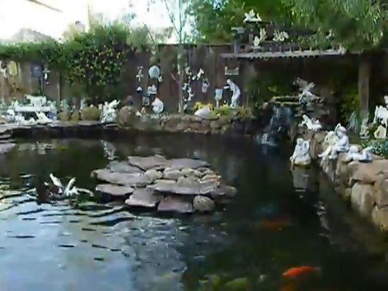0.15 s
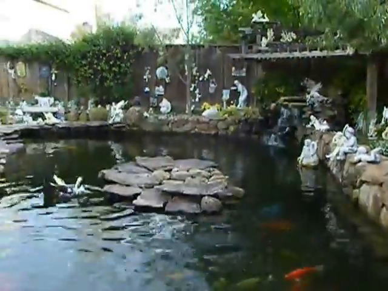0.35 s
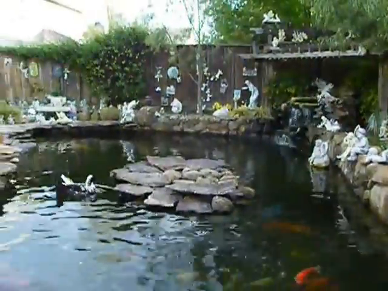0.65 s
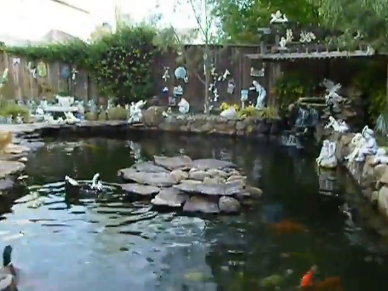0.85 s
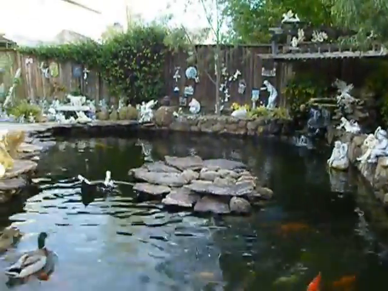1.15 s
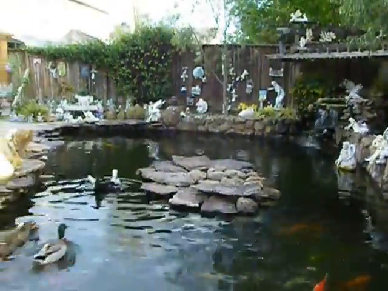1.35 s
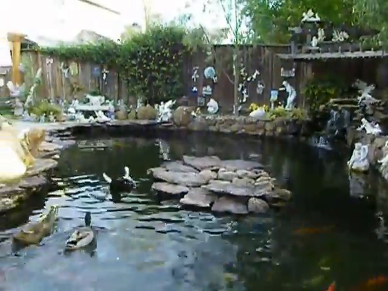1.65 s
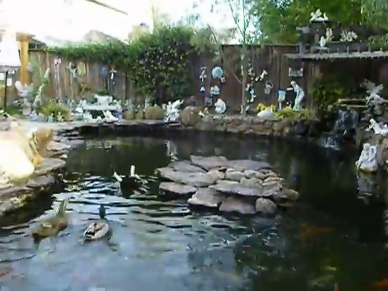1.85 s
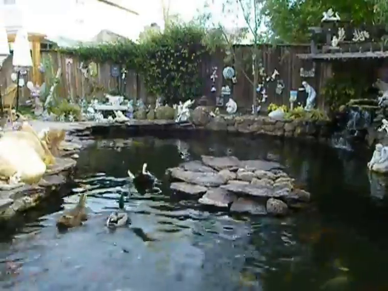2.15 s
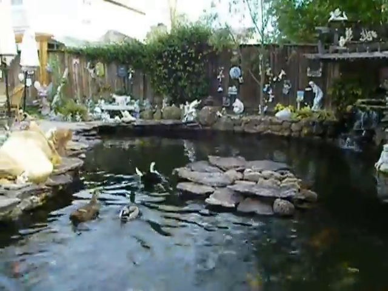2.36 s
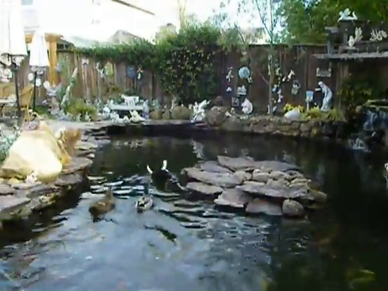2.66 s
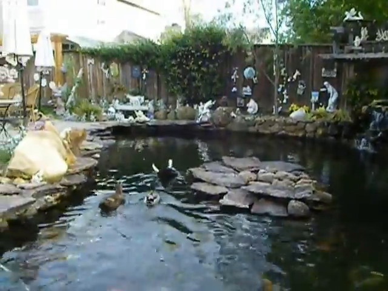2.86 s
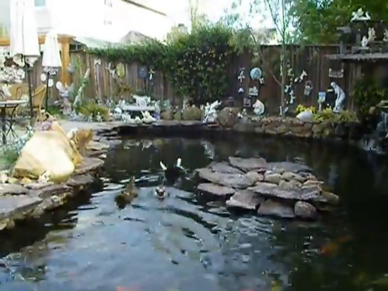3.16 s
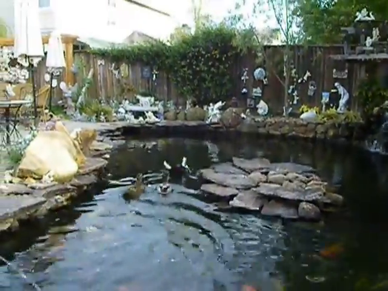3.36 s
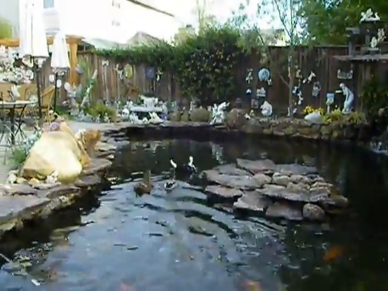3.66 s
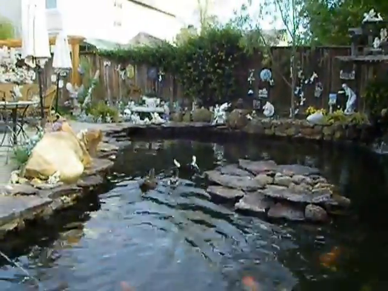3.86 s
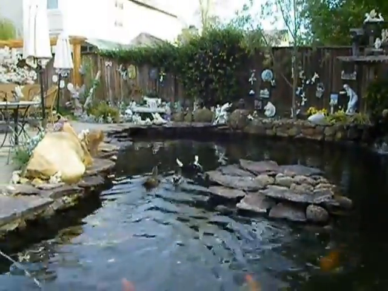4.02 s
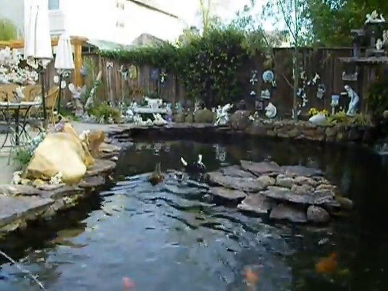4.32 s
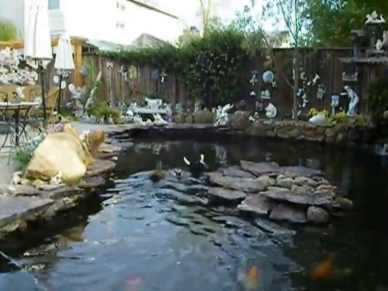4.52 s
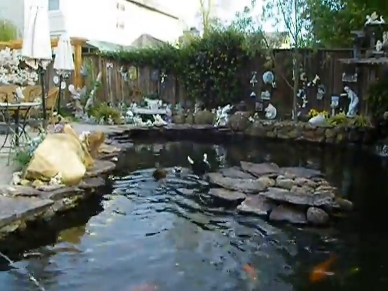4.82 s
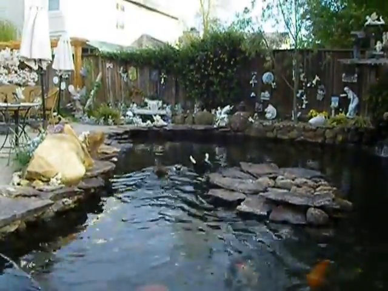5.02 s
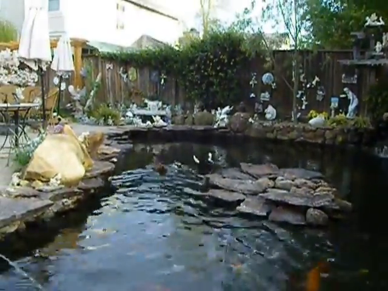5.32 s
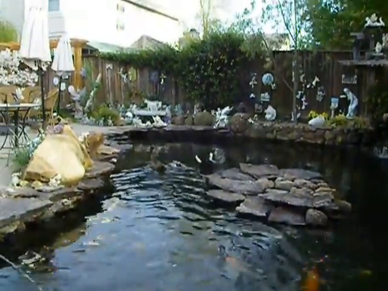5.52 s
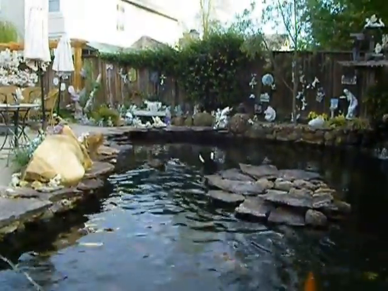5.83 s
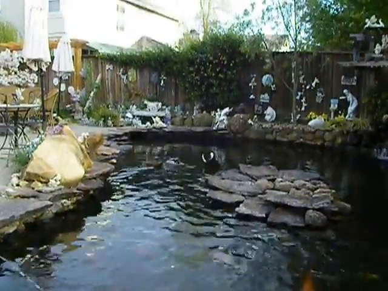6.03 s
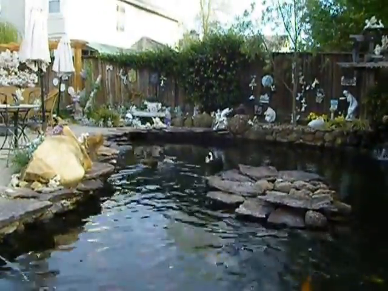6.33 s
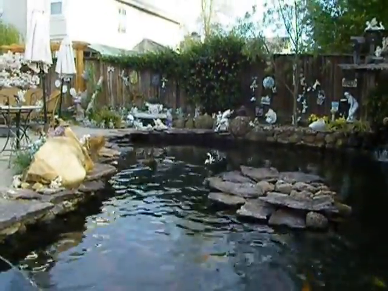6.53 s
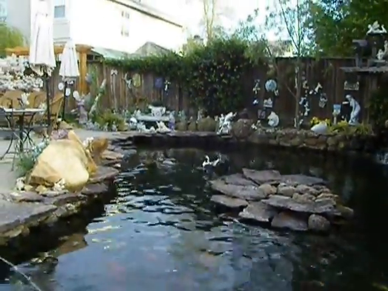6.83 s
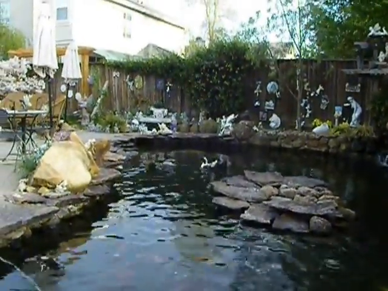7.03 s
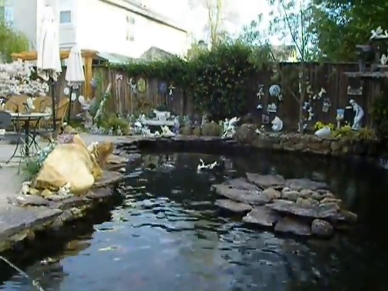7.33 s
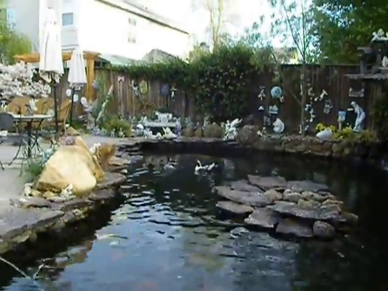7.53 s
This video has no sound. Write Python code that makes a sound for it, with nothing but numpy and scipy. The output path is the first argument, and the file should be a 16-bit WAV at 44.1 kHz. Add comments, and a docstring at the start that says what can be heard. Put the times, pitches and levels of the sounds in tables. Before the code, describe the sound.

A small waterfall splashes steadily into a garden pond, and a duck quacks three times in the second half.

```python
"""Garden waterfall and a duck

A small waterfall splashes into a pond in a fenced yard, heard on one small camera microphone.
Countless drops tick and fizz over a soft wash, bubbles gurgle below it, and a pump hums faintly
over distant rumble. From about five seconds in, a duck quacks three times, pulses of air ringing
its throat and bill; the last quack ends in a creak. The yard returns a short echo."""
import sys
import numpy as np
from scipy import signal
from scipy.fft import rfft, irfft
from scipy.io import wavfile
from scipy.ndimage import uniform_filter1d

SR = 44100
rng = np.random.default_rng(int(sys.argv[2]) if len(sys.argv) > 2 else 0)


def master_out(mix):
    """Clip the mix to full scale and print it as 16-bit PCM to the path in sys.argv[1]."""
    frames = np.transpose(np.atleast_2d(mix))
    ceiling = np.clip(frames, -1, 1)
    pcm = np.round(ceiling * 32767).astype(np.int16)
    wavfile.write(sys.argv[1], SR, pcm)


N = 338688
TIME = np.arange(N) / SR
SURGE_HZ = 22.5  # how fast the stream surges at random
BILL_SHUT_DB = -12  # the duck's shut bill against its throat


def gain_of(db):
    """Decibels to amplitude."""
    return 10 ** (np.asarray(db) / 20)


def unit_rms(x):
    """Scales to an rms of 1."""
    return x / np.sqrt(np.mean(x ** 2) + 1e-20)


def at_hz(points, hz):
    """Reads a curve on a log-frequency axis."""
    freqs, values = np.transpose(points)
    return np.interp(np.log(hz + 1), np.log(freqs + 1), values)


def follow(rows, t):
    """Reads every column of a curve at the times t."""
    times, *columns = np.transpose(rows)
    return [np.interp(t, times, column) for column in columns]


def add(mix, start_s, sound):
    """Adds a sound to the mix at start_s."""
    part = mix[max(round(start_s * SR), 0):][:len(sound)]
    part += sound[:len(part)]


def coloured(x, spectrum):
    """Filters x by a spectrum and scales it to an rms of 1."""
    hz = np.fft.rfftfreq(len(x), 1 / SR)
    return unit_rms(irfft(rfft(x) * gain_of(at_hz(spectrum, hz)), len(x)))


def drift(size, rate_hz):
    """A smooth random wander of rms 1, with little motion above rate_hz."""
    hz = np.fft.rfftfreq(size, 1 / SR)
    return unit_rms(irfft(rfft(rng.standard_normal(size)) * np.exp(-(hz / rate_hz) ** 2), size))


def resonate(x, hz, width_hz):
    """A resonance of gain 1 whose frequency may move."""
    carrier = np.exp(2j * np.pi * np.cumsum(hz * np.ones(len(x))) / SR)
    pole = np.exp(-np.pi * width_hz / SR)
    return 2 * (carrier * signal.lfilter([1 - pole], [1, -pole], x / carrier + 1e-18)).real


def bubble(hz, cycles, rise_cycles, glide, size):
    """A pocket of air rings up and dies away over the given cycles; glide lifts its pitch."""
    turns = hz * np.arange(size) / SR
    bend = 1 + glide * np.minimum(turns / cycles, 2)
    envelope = (1 - np.exp(-turns / rise_cycles)) * np.exp(-turns / cycles)
    wave = envelope * np.sin(2 * np.pi * turns * bend)
    return wave / abs(wave).max()


def shower(pitches, per_s, spread_db, cycles, glide, spray_db, spray_s, size):
    """Drops of all sizes land at random; each throws off a few smaller ones of nearby pitch."""
    count = int(per_s * N / SR)
    when, heft, pitch, polarity, shift = rng.random((count, 5, 5)).transpose(1, 0, 2)
    thrown = np.arange(5) > 0  # the parent drop, then four thrown off
    landing = (when[:, :1] * N - thrown * np.log(1 - when) * spray_s * SR).astype(int) % N
    size_db = spread_db * np.minimum(-np.log(1 - heft[:, :1]), 4.5) + thrown * spray_db
    band = (pitch[:, :1] * len(pitches) + thrown * 6 * (shift - .5)).astype(int)
    height = np.sign(polarity - .5) * gain_of(size_db)
    out = np.zeros(N)
    for k, hz in enumerate(pitches):
        hits = np.bincount(landing[band == k], height[band == k], N)
        ring = bubble(hz, cycles, rise_cycles=0.26, glide=glide, size=size)
        out += signal.oaconvolve(unit_rms(hits), np.sqrt(hz) * ring / np.linalg.norm(ring))[:N]
    return out


def waterfall():
    """Wash, ticking impacts and tiny ringing bubbles, all arriving in uneven gushes."""
    # the fall grows fainter as the microphone turns away from it: time_s, level_db
    flow_curve = [(0, -27), (1.3, -26.5), (3.1, -28.5), (5.0, -29.5), (7.68, -28)]
    # spectrum of the blended wash: frequency_hz, level_db
    wash_spectrum = [(200, -31), (600, -16.5), (1100, -6), (2000, -6), (3200, -5.5), (4200, -3), (5200, 1),
                     (6800, 2.5), (8500, -4.5), (10000, -7.5), (13000, -12), (16000, -17)]
    # spectrum of the separate droplets: frequency_hz, level_db
    spray_spectrum = [(300, -41), (1000, -10.5), (2000, -1), (3200, 0.5), (4200, -1), (5200, 0), (6800, 3),
                      (8500, -3), (10000, -7), (13000, -13.5), (16000, -19)]
    flow = gain_of(follow(flow_curve, TIME)[0] + 0.48 * drift(N, SURGE_HZ))
    gush = drift(N, rate_hz=77)
    wash = gain_of(-4 + 0.64 * gush) * coloured(rng.standard_normal(N), wash_spectrum)
    ticks = shower(np.geomspace(1800, 14000, num=16), per_s=1000, spread_db=4, cycles=1.18,
                   glide=0, spray_db=-8, spray_s=.002, size=256)
    fizz = shower(np.geomspace(1100, 14000, num=36), per_s=1000, spread_db=4.5, cycles=6.8,
                  glide=0.031, spray_db=-11, spray_s=.003, size=1600)
    droplets = gain_of(-4) * coloured(ticks, spray_spectrum)
    droplets += gain_of(-3) * coloured(fizz, spray_spectrum)
    return flow * (wash + gain_of(2.1 * gush) * droplets)


def pool():
    """Larger bubbles gurgle where the stream plunges in; a few gulp loudly."""
    # the churning under the fall: time_s, level_db
    churn_curve = [(0, -40), (3.2, -40.5), (4.9, -41), (7.68, -41)]
    # spectrum of the churning: frequency_hz, level_db
    spectrum = [(100, -39), (200, -20.5), (270, -10.5), (330, -6.5), (400, -4), (500, -4), (650, -1.5),
                (850, 1), (1200, -5), (2000, 1), (5000, -40)]
    # the loudest gulps of trapped air: start_s, peak_db, pitch_hz, decay_cycles
    gulps = [(0.212, -24.5, 865, 4.4), (0.342, -33, 765, 30), (0.76, -25.5, 1420, 8.3),
             (1.171, -23, 724, 3.1), (2.655, -26, 1270, 5), (3.17, -27.5, 930, 6.4), (3.524, -26, 960, 3.3),
             (4.704, -26, 1050, 5.6), (6.682, -34.5, 350, 2.5), (6.99, -22.5, 650, 4.5),
             (7.003, -20, 840, 2.8), (7.036, -27.5, 630, 3)]
    bubbles = shower(np.geomspace(280, 1600, num=28), per_s=400, spread_db=3.36, cycles=5.3,
                     glide=.03, spray_db=-13.5, spray_s=.012, size=5000)
    churn = gain_of(-1) * coloured(bubbles, spectrum)
    churn += gain_of(-4) * coloured(rng.standard_normal(N), spectrum)
    out = gain_of(follow(churn_curve, TIME)[0] + drift(N, SURGE_HZ)) * churn
    for start_s, db, hz, cycles in gulps:
        gulp = bubble(hz, cycles, rise_cycles=0.15 * cycles, glide=0.0082, size=7000)
        add(out, start_s, gain_of(db) * gulp)
    return out


def lesser_drops(per_s=8, tick_db=0.5):
    """Middling drops, one at a random moment in each slot of time: rows like those of the big ones."""
    rows = []
    for slot, (when, heft, pitch) in enumerate(rng.random((int(per_s * N / SR), 3))):
        db = np.interp(heft, (0, 1), (-13.5, -9))
        hz = np.interp(np.sqrt(pitch), (0, 1), (3300, 7250))
        rows.append(((slot + when) / per_s, db, hz, tick_db))
    return rows


def drops_and_rasp():
    """Drops on stone and water tick, ring briefly and spray; one such burst is a rasp in a quack."""
    # the biggest drops, and a short high rasp in the first quack (at 5.384 s):
    # start_s, level_db, pitch_hz, tick_against_ring_db
    bursts = [(0.057, -1.5, 3420, -1), (0.1034, -3, 5930, -8), (0.1287, -6.5, 4650, -5),
              (0.1397, -3.5, 3470, 0), (0.3443, -6.5, 2890, -16), (0.56, 0.5, 6720, 14),
              (0.8773, 0, 5800, -8), (0.9644, -3.5, 6600, -13), (1.021, -4, 3270, -11),
              (1.209, -2.5, 7040, -18), (1.269, -1, 7100, 2), (1.3094, -5, 5990, -8),
              (1.363, -11, 3300, -12), (1.593, -4, 3050, -0.5), (1.7997, -6, 6630, -11),
              (1.9214, -6.5, 10160, -12), (2.2605, -3, 8310, -6), (2.294, -6, 5800, 3),
              (2.3404, -10, 3270, -5), (2.4522, -5, 6800, -4), (2.5782, 1.5, 5990, 2),
              (2.6034, -3.5, 6590, -11), (2.7928, -3, 6200, -23), (2.9646, -1, 6330, 12),
              (3.181, -6, 10800, -13), (3.4107, -3.5, 2100, -14), (3.466, -8, 6460, -19),
              (3.9105, -0.5, 3750, -5.5), (3.9903, -4, 6160, -14), (4.0176, -11.5, 2280, -14),
              (4.1278, 0, 6840, -14), (4.171, -4.5, 2800, -1), (4.3942, -1.5, 6720, 11),
              (4.7164, 1, 6800, 6), (4.7408, -5.5, 5230, -14), (4.8076, -5, 6720, -8),
              (5.1326, -7, 2800, -6.5), (5.3758, -7, 3140, -12), (5.384, -4, 5400, -16),
              (5.4496, -10, 2170, -16), (5.895, 3.5, 7160, -7), (5.9673, -9, 3400, -6),
              (6.0658, -5, 5940, 4), (6.219, -7, 6700, -1), (6.4373, -3, 6120, 0), (6.5757, -6, 6590, -18),
              (6.6521, -11.5, 4180, -17), (6.6958, 0.5, 3270, -2), (7.004, -15, 2480, -12),
              (7.0182, -14, 6930, -6), (7.1753, -10, 3790, -4), (7.1978, 1.5, 6700, 0),
              (7.4847, -10, 4390, -15)]
    # spectrum of the first sharp contact: frequency_hz, level_db
    tick_spectrum = [(300, -34), (1200, -14), (3000, -4.5), (6000, 9), (9500, 10), (13000, -0.5),
                     (16000, -9)]
    spray_db = -20.5  # every drop throws off about the same spray
    out, t = np.zeros(N), np.arange(1500) / SR
    tick = coloured(signal.unit_impulse(len(t), 8), tick_spectrum)
    for start_s, db, hz, tick_db in list(bursts) + lesser_drops():
        ring = unit_rms(bubble(hz, cycles=2.65, rise_cycles=0.56, glide=0, size=len(t)))
        burst = ring + gain_of(tick_db) * tick
        mist = resonate(rng.standard_normal(len(t)), hz, width_hz=0.35 * hz)
        spray = unit_rms(mist) * np.exp(-t / 0.0038)
        add(out, start_s, gain_of(db) * burst / abs(burst).max() + gain_of(spray_db) * spray)
    # so small a splash radiates no bass
    return signal.sosfilt(signal.butter(4, 750, "high", fs=SR, output="sos"), out)


def hum(hz, db):
    """A tone whose pitch wavers slightly."""
    wavering_hz = hz + 1.49 * drift(N, rate_hz=3.9)
    return gain_of(db) * unit_rms(np.sin(2 * np.pi * np.cumsum(wavering_hz) / SR))


def pump_and_rumble():
    """The pump's steadily fading hum and a faint higher drone, over distant rumble."""
    # the drone comes and goes: time_s, level_db
    drone_curve = [(0, -67), (2.0, -85), (3.3, -76.5), (6.4, -75), (6.65, -69), (7.3, -67.5), (7.5, -78)]
    # spectrum of the distant rumble: frequency_hz, level_db
    rumble_spectrum = [(20, 1.5), (50, -1.5), (100, 4.5), (160, 1.5), (220, -7.5), (500, -26), (2000, -60)]
    pump = hum(hz=72, db=-65.5 - 1.6 * TIME)
    drone = hum(hz=156, db=follow(drone_curve, TIME)[0])
    return pump + drone + gain_of(-66.5) * coloured(rng.standard_normal(N), rumble_spectrum)


def cavity(x, hz, width_hz):
    """An air space in the duck's head rings: the same resonance twice in series."""
    return resonate(resonate(x, hz, width_hz), hz, width_hz)


def levelled(x):
    """Evens out the level over a few cycles, keeping the pulses."""
    return x / np.sqrt(abs(uniform_filter1d(x ** 2, size=1000)) + 1e-9)


def duck_voice(hz, rough, throat_db, bill_db, throat_hz, nasal):
    """Pulses and puffs of air ring throat, bill and nasal cavities; rough is the share of puffs."""
    # spectrum of the weak low part of the voice: frequency_hz, level_db
    low_spectrum = [(200, -39), (400, -4.5), (520, -8), (700, 1), (1000, -0.5), (1400, 0), (2200, -6.5),
                    (3100, -7.5), (5000, -12), (10000, -45)]
    size = len(hz)
    rough = np.clip(rough, 0, 1)
    turns = np.cumsum(hz * (1 + 0.06 * rough * drift(size, rate_hz=130))) / SR
    pulses = unit_rms(sum(np.cos(2 * np.pi * k * turns) for k in np.arange(1, 36)))
    pulses *= 1 + .5 * rough * drift(size, rate_hz=150)
    puffs = unit_rms((.2 + np.exp(-(turns % 1) / 0.35)) * rng.standard_normal(size))
    drive = (1 - rough) * pulses + rough * puffs
    throat = gain_of(throat_db) * levelled(cavity(drive, throat_hz, width_hz=213))
    bill = gain_of(bill_db) * levelled(cavity(drive, hz=1716, width_hz=170))
    # the low part changes little with effort; the overtones come only when the duck pushes
    loud_db = np.maximum(throat_db, bill_db)
    push_db = loud_db - loud_db.max()
    low = gain_of(-30.8 + .3 * push_db) * coloured(0.65 * drive + 0.35 * puffs, low_spectrum)
    overtones = sum(gain_of(db) * unit_rms(cavity(drive, centre, width)) for centre, width, db in nasal)
    call = throat - bill + low + gain_of(loud_db + 0.51 * push_db) * overtones
    return call * signal.windows.tukey(size, .06)


def quack(swell_s, hold_s, fade_s, db, top_hz, sag_hz_per_s, pushed_hz,
          throat_loss_db, bill_gain_db, held_rough, nasal):
    """A rattle speeds up into a clear nasal note; the bill opens, then the note sags and breaks up."""
    start_hz, climb_s, slack_throat_hz = 109.7, .056, 1352
    stages = np.cumsum([0, swell_s, hold_s, fade_s])
    t = np.arange(0, stages[-1], 1 / SR)
    climb = 1 - np.exp(-(t / climb_s) ** 1.59)
    hz = start_hz + (top_hz - start_hz) * climb - sag_hz_per_s * np.maximum(t - stages[2], 0)
    level_db = db + np.interp(t, stages, [-17.5, 0, 0, -28])
    rough = np.interp(t, stages, [0.31, held_rough, held_rough, 0.8])
    push = np.interp(t, stages, [0, 1, 1, 0])
    gape = np.sin(np.pi / 2 * np.interp(t, stages, [0, 0.16, 0.95, 0.086])) ** 2
    throat_hz = slack_throat_hz + (pushed_hz - slack_throat_hz) * push ** 2 * (1 - gape ** 2)
    throat_db = level_db - throat_loss_db * gape ** 2
    bill_db = level_db + BILL_SHUT_DB + bill_gain_db * gape
    return duck_voice(hz, rough, throat_db, bill_db, throat_hz, nasal)


def creak(nasal):
    """A last push through a slack throat and a shut bill; returns its start time and its sound."""
    # the pulses drop to about a third of their rate: time_s, pitch_hz, level_db
    creak_curve = [(7.42, 200, -36), (7.443, 216.4, -24), (7.46, 213.7, -16), (7.467, 74.9, -27),
                   (7.49, 75, -25), (7.503, 74.2, -49), (7.54, 74, -49)]
    t = np.arange(creak_curve[0][0], creak_curve[-1][0], 1 / SR)
    hz, db = follow(creak_curve, t)
    sound = duck_voice(hz, rough=.27, throat_db=db, bill_db=db + BILL_SHUT_DB,
                       throat_hz=1384, nasal=nasal)
    return t[0], sound


def duck():
    """Three quacks, the last running on into a creak."""
    # the calls: start_s, swell_s, hold_s, fade_s, level_db, top_pitch_hz, sag_hz_per_s,
    # pushed_throat_hz, open_throat_loss_db, open_bill_gain_db, held_roughness (0-1)
    quacks = [(5.23, 0.11, 0.083, 0.077, -17.5, 199.8, 314, 1410, 2.9, 6.6, 0.19),
              (6.118, .135, .09, .095, -17, 212.3, 1047, 1460, 7.3, 12, 0.097),
              (7.233, .11, 0.0436, 0.057, -18.5, 206.5, 353, 1400, 2.1, 1.7, 0.14)]
    # nasal overtones of each quack at full effort: centre_hz, width_hz, against_louder_resonance_db
    nasals = [
        [(4200, 310, -17), (5300, 660, -22)],
        [(2430, 310, -18), (4830, 1000, -18.5)],
        [(2600, 500, -26), (4370, 1300, -19)],
    ]
    out = np.zeros(N)
    for (start_s, *shape), nasal in zip(quacks, nasals):
        add(out, start_s, quack(*shape, nasal))
    add(out, *creak(nasals[-1]))
    return out


def yard_echo(x):
    """Fence, rocks and plants return a short scattered echo."""
    # time the echo takes to fall by 60 dB: frequency_hz, decay_s
    decay = [(300, 0.36), (1500, 0.27), (5000, 0.21), (14000, 0.048)]
    size, first_echo_s = SR // 2, .012
    taps = rng.standard_normal(size) * (rng.random(size) < .05) * (TIME[:size] > first_echo_s)
    hz, t, bands = signal.stft(taps, SR, nperseg=256)
    fade = gain_of(-60 * t / at_hz(decay, hz)[:, None])
    tail = signal.istft(bands * fade, SR, nperseg=256)[1]
    return signal.oaconvolve(x, tail / np.linalg.norm(tail))[:N]


def scene():
    """Water and duck at the pond, in mono; the duck carries more of the yard's echo."""
    water = waterfall() + pool() + drops_and_rasp()
    calls = duck()
    echo = yard_echo(gain_of(-9.5) * calls + gain_of(-20) * water)
    return (water + calls + echo + pump_and_rumble())[None]


def record(dry):
    """The small microphone has a narrow notch in the treble, and the very top is cut off."""
    notch_hz, half_width_hz, cutoff_hz = 7900, 380, 15900
    detune = (np.fft.rfftfreq(N, 1 / SR) - notch_hz) / half_width_hz
    notched = irfft(rfft(dry) * (0.026 + 1j * detune) / (1 + 1j * detune), N)
    lowpass = signal.firwin(511, cutoff_hz, window=("kaiser", 9), fs=SR)
    return signal.oaconvolve(notched, lowpass[None], "same")


dry = scene()
out = record(dry)
master_out(out)
```